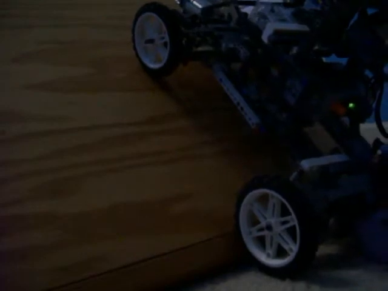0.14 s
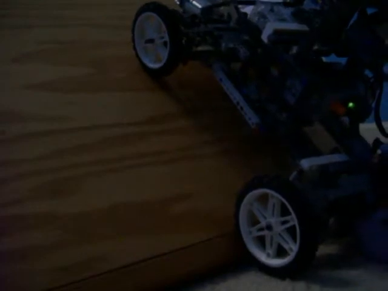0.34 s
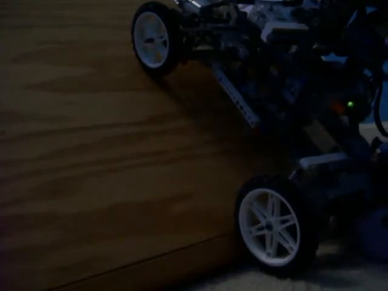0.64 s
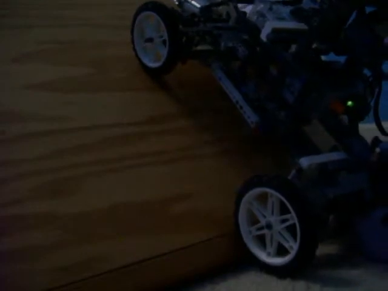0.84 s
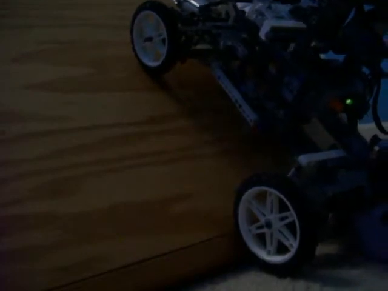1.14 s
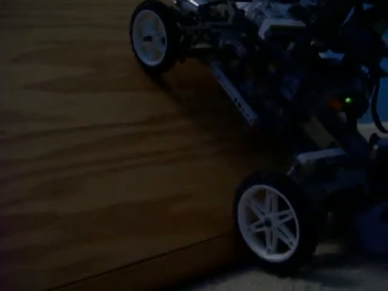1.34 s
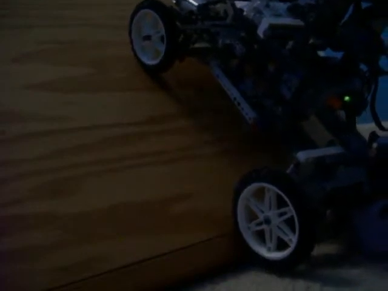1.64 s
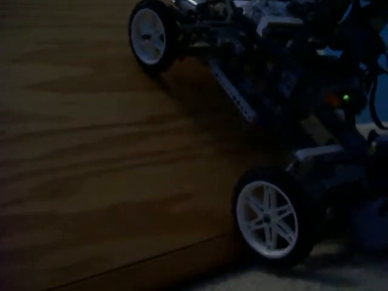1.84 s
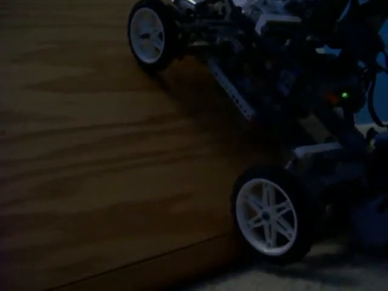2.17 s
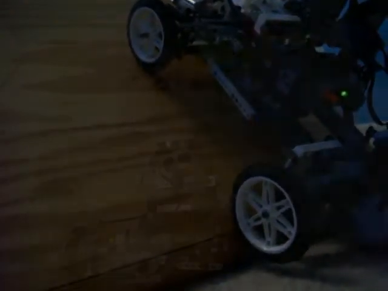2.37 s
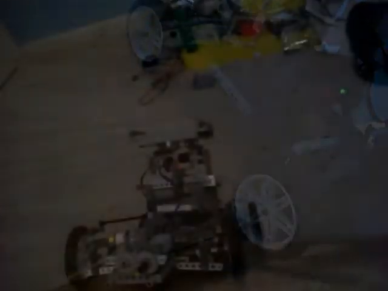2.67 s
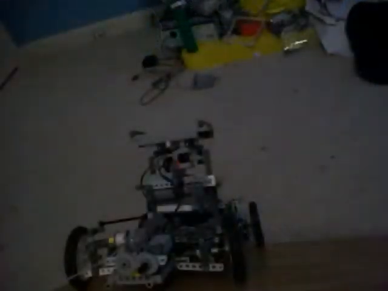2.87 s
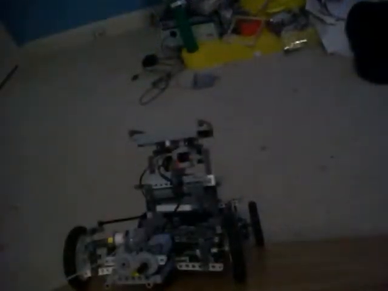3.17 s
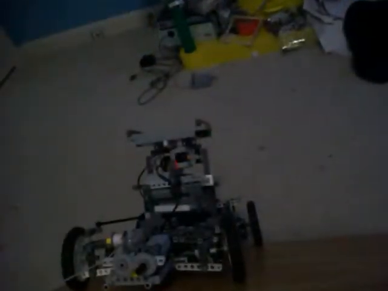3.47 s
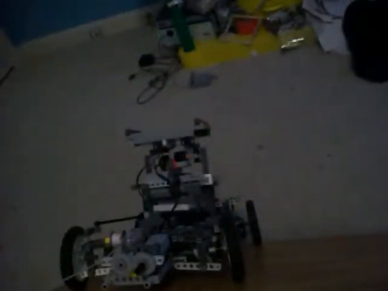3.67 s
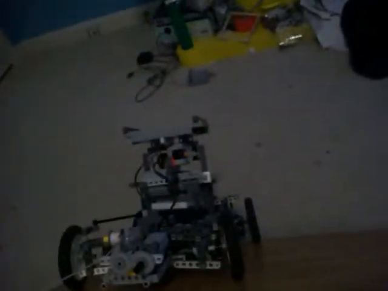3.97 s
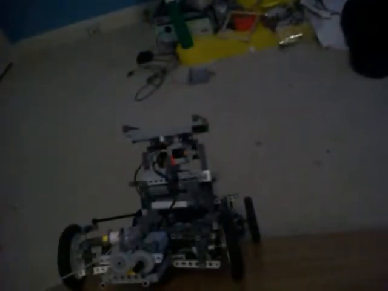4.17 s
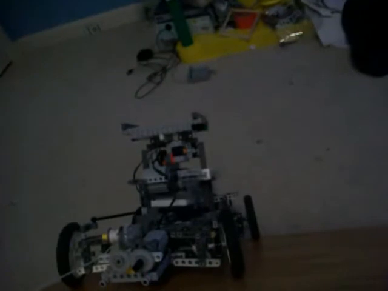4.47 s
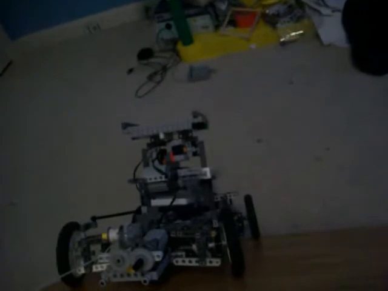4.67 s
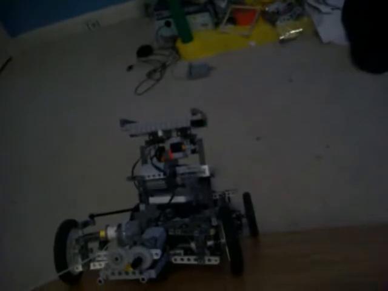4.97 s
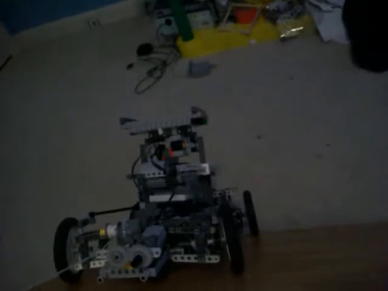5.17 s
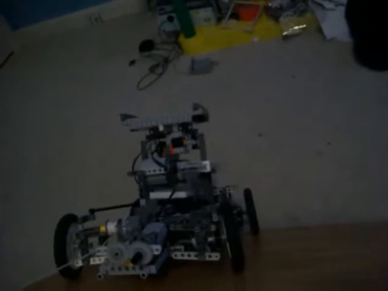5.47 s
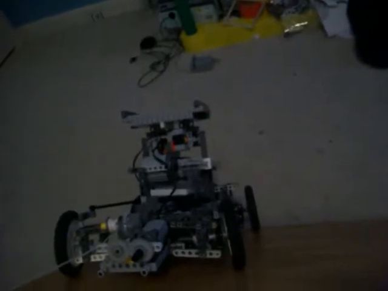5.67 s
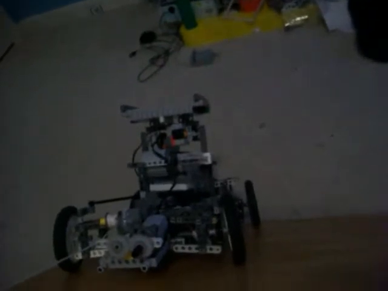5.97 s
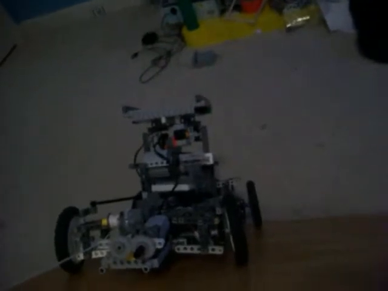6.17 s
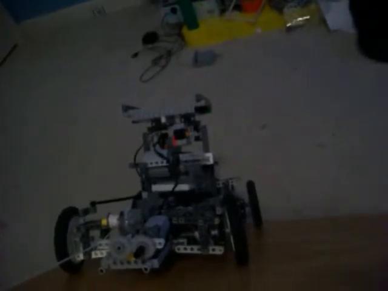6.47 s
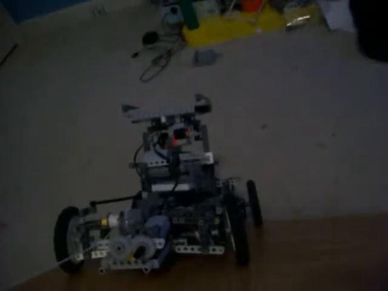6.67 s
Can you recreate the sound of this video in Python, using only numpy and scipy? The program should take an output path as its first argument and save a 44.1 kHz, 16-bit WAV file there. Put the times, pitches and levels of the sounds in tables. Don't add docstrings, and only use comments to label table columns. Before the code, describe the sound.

Indoors, very close to a cheap microphone with no high treble, a small electric toy motor drives a winch through plastic gears. From 0 to 2.4 s, heard from the side, dense rattling chatter throbs about twelve times a second, with a rough whine sagging from roughly 1900 to 1650 Hz over faint low hum and a slowly rising cord tone. Between 2.4 and 2.9 s it crossfades to a view from above: a different, slightly louder whir with a clearer whine near 1700 Hz and added buzzing tones. Low hand rumble grows. Faint ticks and a short scrape come near 3.95 s, a dull snap at 4.9, the loudest, clipped snap at 5.1 and a lower one at 5.4. Soft bumps tap the microphone from 5.4 to 6.35 s, sharpest at 6.2. Around 6.1 s the cord slips and the whine jumps up briefly, settles, then rises again as the whirring runs to the end at 6.8.

```python
import sys
import numpy as np
from scipy import signal
from scipy.fft import rfft, irfft, next_fast_len
from scipy.io import wavfile
from scipy.ndimage import uniform_filter1d

SR = 44100
rng = np.random.default_rng(int(sys.argv[2]) if len(sys.argv) > 2 else 0)


def wav_out(sig):
    wavfile.write(sys.argv[1], SR, np.round(np.clip(np.atleast_2d(sig).T, -1, 1) * 32767).astype(np.int16))


def how_loud(loudness_db):
    steps = np.asarray(loudness_db, float) / 20
    return 10 ** steps


N = 300762
TIME = np.arange(N) / SR

# start_s, chatter_db
EFFORT = [(0, -38), (.2, -37.5), (2.3, -38), (2.5, -39), (2.75, -40.5), (2.9, -36.5), (3.7, -36),
          (3.9, -35), (4.6, -36), (5.3, -35), (6.6, -34.8), (6.82, -33.5)]
# start_s, share_from_above (0-1)
VIEW = [
    (0, 0.05),
    (2.42, 0.14),
    (2.88, 0.96),
    (6.82, 1),
]


def curve(table):
    s, *columns = np.transpose(table)
    return [np.interp(TIME, s, c) for c in columns]


def unit(x):
    return x / np.sqrt(np.mean(x ** 2))


def walk(rate_hz):
    levels = uniform_filter1d(rng.standard_normal(int(4 * rate_hz * N / SR) + 2), size=4)
    return np.interp(TIME, np.arange(len(levels)) / (4 * rate_hz), 2 * levels)


def colour(x, spectrum, modes=()):
    n = next_fast_len(N)
    hz = np.fft.rfftfreq(n, 1 / SR) + 1e-3
    corner_hz, corner_db = np.transpose(spectrum)
    db = np.interp(np.log(hz), np.log(corner_hz), corner_db)
    for centre_hz, width_hz, lift_db in modes:
        db = db + lift_db / (1 + (2 * (hz - centre_hz) / width_hz) ** 2)
    return irfft(rfft(np.pad(x, (0, n - N), "reflect")) * how_loud(db), n)[:N]


def tone(hz, wander_hz=0.):
    return np.sqrt(2) * np.sin(np.cumsum(hz + wander_hz * walk(30)) * (2 * np.pi / SR))


def swell(centre_s, half_s):
    return np.exp(-((TIME - centre_s) / half_s) ** 2)


def gate(start_s, end_s):
    return np.clip(np.minimum(TIME - start_s, end_s - TIME) / .03, 0, 1)


def speeds():
    # start_s, mesh_hz
    top_speed = [(2.68, 1743), (3.1, 1732), (4.3, 1708), (4.7, 1701), (5.95, 1716), (6.1, 1772),
                 (6.48, 1701), (6.7, 1728), (6.82, 1824)]
    start_hz, settled_hz, sag_s = 1925, 1630, .95
    side_hz = settled_hz + (start_hz - settled_hz) * np.exp(-TIME / sag_s)
    return side_hz, curve(top_speed)[0]


def gears(above, mesh_hz):
    # hz, db_per_hz
    side_colour = [(60, -6.5), (120, -3), (203, -8.5), (300, -11), (442, -12), (709, -14.5), (1350, -11),
                   (2000, -10.5), (2440, -5), (3420, -10), (4200, -7.5), (4970, -8.5), (5600, -9.5),
                   (7000, -12.5)]
    above_colour = [(60, -11.5), (120, -8.5), (190, -12), (284, -13.5), (709, -13.5), (1160, -15),
                    (1740, -8), (2100, -14), (2600, -8.5), (3600, -4), (4250, -7), (4550, -11),
                    (5310, -13.5), (7000, -15.5)]
    # hz, width_hz, lift_db
    side_modes = [(726, 58, 6), (2600, 68, -1), (2940, 60, 4.5), (3255, 65, 8), (3600, 100, -0.5),
                  (4260, 120, 5), (4920, 160, 5), (5240, 110, 0)]
    above_modes = [(517, 17, 3.5), (920, 180, 3), (1940, 80, -1), (2396, 51, 7), (2513, 48, 3.5),
                   (2720, 25, 3.5), (3000, 44, 1.5), (3080, 44, 2.5), (3660, 430, 3), (3650, 66, -3),
                   (4110, 85, 4), (5310, 140, 6)]
    # start_s, turns_beyond_steady_rate
    throb_drift = [(0, 0.094), (.7, 0.56), (1.6, 0.73), (2.5, 0.56), (5.2, 0.89), (6.82, 1.16)]
    throb_hz, side_depth, above_depth = 11.9, 0.084, 0.14

    scrape = swell(3.98, .035)
    chatter_db = curve(EFFORT)[0] + 0.3 * scrape
    drone_db = -7.5 + 3 * scrape

    angle = 2 * np.pi * (throb_hz * TIME + curve(throb_drift)[0])
    depth = side_depth + above * (above_depth - side_depth)
    throb = 1 + depth * (np.cos(angle) + 0.63 * np.cos(2 * angle + .5))

    bunching = 1 + 0.023 * tone(0.29 * mesh_hz, wander_hz=3.) + 0.041 * tone(.07 * mesh_hz, wander_hz=3.)
    impacts = rng.standard_normal(N) * bunching * how_loud(1.6 * walk(900) + 0.76 * walk(110))
    from_side = unit(colour(impacts, side_colour, side_modes))
    from_above = unit(colour(impacts * rng.choice([-1., 1.], N), above_colour, above_modes))
    frame = np.sqrt(1 - above) * from_side + np.sqrt(above) * from_above

    drone = colour(frame, [(1500, 3), (2100, -64.5)])
    chatter = unit(frame - drone) * throb * how_loud(chatter_db + 0.17)
    return chatter + unit(drone) * throb ** 0.35 * how_loud(chatter_db + drone_db + 1.0)


def whine(above):
    # multiple_of_whine, side_db, above_db (re chatter), tremble_hz
    orders = [(.169, -28, -28, 4), (.395, -26, -34, 7), (.48, -23.5, -40, 7), (.51, -27, -28, 7),
              (.675, -25, -32, 9), (.845, -25, -40, 10), (1.22, -24, -28, 16), (1.485, -18, -21, 22),
              (1.84, -26, -20, 26), (1.95, -21, -25, 30), (2.15, -21, -20, 26), (2.38, -26, -21, 28),
              (2.475, -19, -20, 28), (2.97, -22, -24, 36)]
    drum_hz, drum_crest_s, drum_sway = 4.05, 3.15, .009
    side_mesh_db, top_mesh_db, slip_lift_db = -18.5, -16, 2
    pinion_hz, pinion_db, pinion_end_s = 1446, -20.5, 6.15
    buzz_hz, buzz_db, buzz_end_s, buzz_swell_db = 821, -19, 6.6, 3
    squeak_hz, squeak_db = 910, -50

    chatter_db = curve(EFFORT)[0]
    slip = gate(6.0, 6.38)
    drum = np.cos(2 * np.pi * drum_hz * (TIME - drum_crest_s))
    side_hz, top_hz = [hz * (1 + drum_sway * drum) for hz in speeds()]

    side_db = chatter_db + side_mesh_db + 1.5 * walk(4)
    top_db = chatter_db + top_mesh_db + slip_lift_db * slip + 1.2 * walk(8)
    buzz_share = above * (1 - slip) * gate(0, buzz_end_s)
    lines = [(side_hz, side_db, 1 - above, 8),
             (top_hz, top_db, above, 9),
             (pinion_hz, chatter_db + pinion_db, above * gate(0, pinion_end_s), 9),
             (buzz_hz, chatter_db + buzz_db - buzz_swell_db * drum, buzz_share, 2.5),
             (squeak_hz, squeak_db, swell(6.12, .05) ** 2, 4)]

    speed_hz = np.where(above < .5, side_hz, top_hz)
    heard = abs(1 - 2 * above)
    for multiple, from_side_db, from_top_db, tremble_hz in orders:
        db = chatter_db + np.where(above < .5, from_side_db, from_top_db) + 1.5 * walk(2.5)
        lines.append((multiple * speed_hz, db + 2.5 * (multiple > 1), heard, .5 * tremble_hz))

    out = np.zeros(N)
    for hz, db, share, tremble_hz in lines:
        level = np.sqrt(share) * how_loud(db + 2.4 * walk(35) - 1.3)
        out += level * tone(hz, wander_hz=tremble_hz)
    return out


def snaps():
    # peak_s, peak_db, tilt_db_per_octave (towards 2 kHz), share_of_ring_time
    snap_events = [
        (3.9512, -24, 2, .6),
        (3.9662, -20, 6, 1),
        (4.9104, -17, 13, .6),
        (5.0752, -0.55, 1.5, 1),
        (5.4346, -8, 8, .65),
        (5.4372, -24, 14, .6),
    ]
    # hz, mode_db, ring_s
    snap_modes = [(400, -20, .0025), (1000, -20, .002), (1500, -21, .0015), (2150, -9, .0013),
                  (2800, -6, .0016), (4080, 0, .0013), (4900, -13, .0012), (6000, -16, .0008)]
    rise_s = .00068
    out = np.zeros(N)
    t = np.arange(-200, 600) / SR
    detune = rng.standard_normal((len(snap_events), len(snap_modes)))
    for (peak_s, peak_db, tilt_db, share), chances in zip(snap_events, detune):
        ring = 0
        for (hz, mode_db, ring_s), chance in zip(snap_modes, chances):
            gain = how_loud(mode_db + tilt_db * np.log2(4000 / max(hz, 2000)))
            lag = np.pi / 2 * (hz < 2000)
            shape = np.exp(-(t / share / np.where(t < 0, rise_s, ring_s)) ** 2)
            ring = ring + gain * shape * np.cos(2 * np.pi * hz * (1 + .006 * chance) * t - lag)
        out[np.round((peak_s + t) * SR).astype(int)] += how_loud(peak_db) * ring / ring.max()
    return out


def handling(above):
    # hz, db_per_hz
    rumble_colour = [(4, -13), (12, 3.5), (25, -5.5), (45, -14.5), (70, -23.5), (150, -31), (300, -45.5)]
    # centre_s, half_s, level_db
    shifts = [(0.008, 0.018, -36.5), (0.109, .035, -34), (0.872, .08, -41), (1.244, .12, -41.5),
              (1.63, .03, -35.5), (1.94, 0.071, -40.5), (2.3, .05, -34.5), (3.247, 0.074, -32),
              (3.42, .04, -33), (3.51, .03, -38.5), (3.656, 0.13, -36), (3.88, .025, -29.5),
              (4.122, 0.043, -25), (4.33, 0.15, -35), (4.577, .05, -22.5), (4.705, 0.097, -32.5),
              (4.883, 0.025, -32), (5.033, 0.057, -29), (5.261, 0.022, -31.5), (5.398, .03, -32.5),
              (6.35, .1, -33.5), (6.602, .04, -35), (6.75, .03, -35)]
    # peak_s, peak_db, push_s (negative for a pull)
    bumps = [(2.997, -22, -.0002), (3.3875, -22, -.0002), (5.443, -19, .0026), (5.449, -25, .004),
             (5.46, -27, .006), (5.552, -19.5, .003), (5.558, -30, .003), (5.571, -26, .005),
             (5.587, -27, .005), (5.646, -25, .003), (5.651, -27, .004), (5.8035, -21, .003),
             (5.808, -23, .004), (5.889, -26, .003), (5.896, -25, .006), (6.2222, -12, .0009),
             (6.2236, -24, .0008), (6.2252, -12, .0014), (6.228, -21, .003), (6.256, -21, -.012),
             (6.3397, -24, .0014), (6.343, -19.5, .0022), (6.3465, -24, .002)]
    side_db, above_db = -48.5, -42.5
    power = how_loud(side_db + above * (above_db - side_db)) ** 2
    for centre_s, half_s, db in shifts:
        power = power + (how_loud(db) * swell(centre_s, half_s)) ** 2
    rumble = unit(colour(rng.standard_normal(N), rumble_colour)) * np.sqrt(power)

    pushes = np.zeros(N)
    for peak_s, db, push_s in bumps:
        i = slice(int((peak_s - .03) * SR), int((peak_s + .03) * SR))
        t = TIME[i] - peak_s
        shape = np.exp(-(t / push_s / np.where(t < 0, .42, .8)) ** 2)
        pushes[i] += np.sign(push_s) * how_loud(db) * shape
    return rumble + signal.sosfilt(signal.butter(1, 14., "high", fs=SR, output="sos"), pushes)


def hum(above):
    # hz, side_db, above_db
    hum_lines = [(54.7, -53, -51), (58.54, -49, -52), (109.4, -60, -51), (117.09, -61, -54.5),
                 (165, -65, -59), (234.26, -57.5, -60), (286, -68.5, -63.5)]
    # start_hz, end_hz, level_db
    cord_notes = [(84, 93, -51), (132, 147, -55)]
    beat_crest_s = 1.47
    out = np.zeros(N)
    for hz, side_db, above_db in hum_lines:
        level = how_loud(side_db + above * (above_db - side_db) + .8 * walk(6))
        out += np.sqrt(2) * np.cos(2 * np.pi * hz * (TIME - beat_crest_s)) * level
    pull = np.clip(TIME / VIEW[1][0], 0, 1)
    for start_hz, end_hz, db in cord_notes:
        note = tone(start_hz + (end_hz - start_hz) * pull, wander_hz=2.5)
        out += (1 - above) * note * how_loud(db + 1.5 * walk(7.2))
    return out


def scene():
    above = curve(VIEW)[0]
    mesh_hz = np.where(above < .5, *speeds())
    return (gears(above, mesh_hz) + whine(above) + snaps() + handling(above) + hum(above))[None]


def band_limit(x):
    return signal.sosfilt(signal.butter(12, 15800, fs=SR, output="sos"), x)


def record(dry):
    # hz, db
    mic_colour = [(5500, 1.5), (5900, -1.5), (6200, -10.5), (6500, -16.5), (6800, -20.5), (6950, -29),
                  (7060, -35.5), (7700, -69)]
    offset, ceiling, noise_db = -.0205, .95, -106
    band = colour(dry[0], mic_colour)[None]
    clipped = np.minimum(band + offset, ceiling) + how_loud(noise_db) * rng.standard_normal(dry.shape)
    mix = signal.sosfiltfilt(signal.cheby2(10, 30, 15800., fs=SR, output="sos"), clipped)
    return band_limit(mix)


dry = scene()
out = record(dry)
wav_out(out)
```